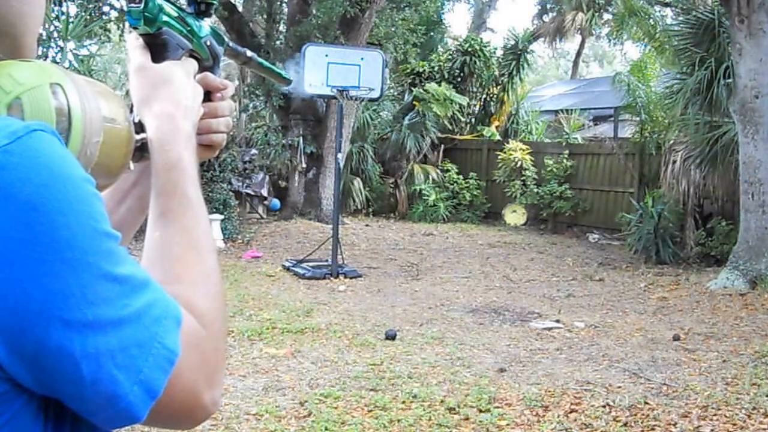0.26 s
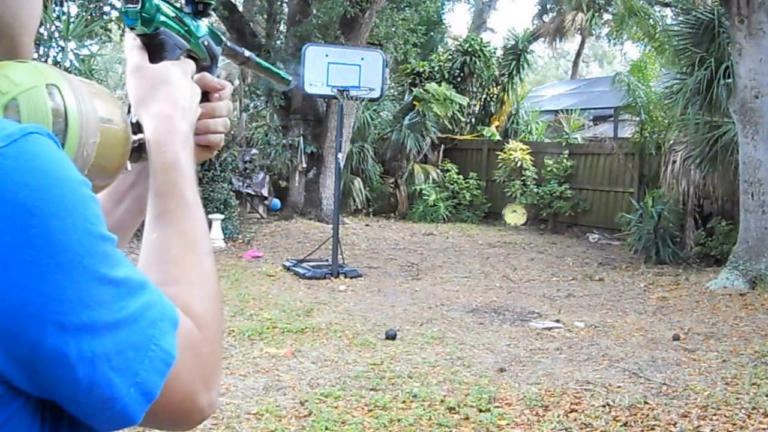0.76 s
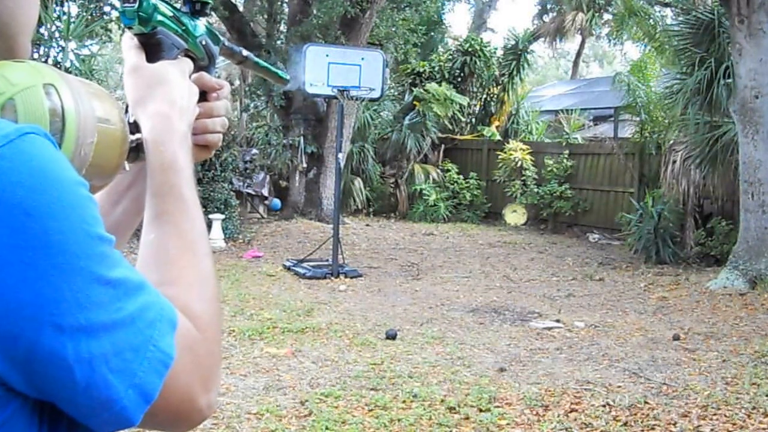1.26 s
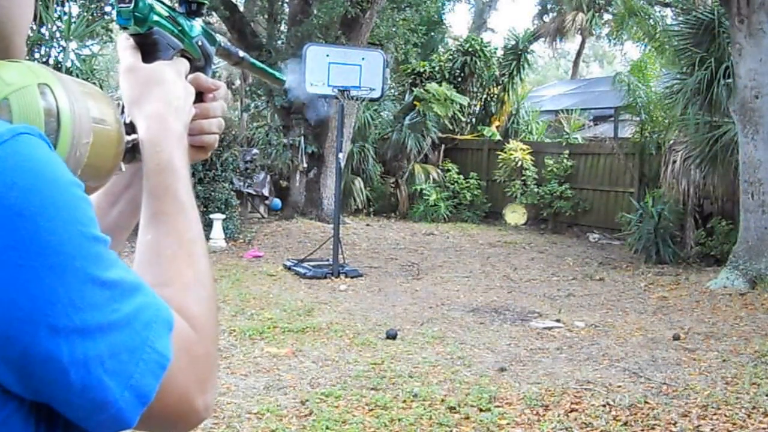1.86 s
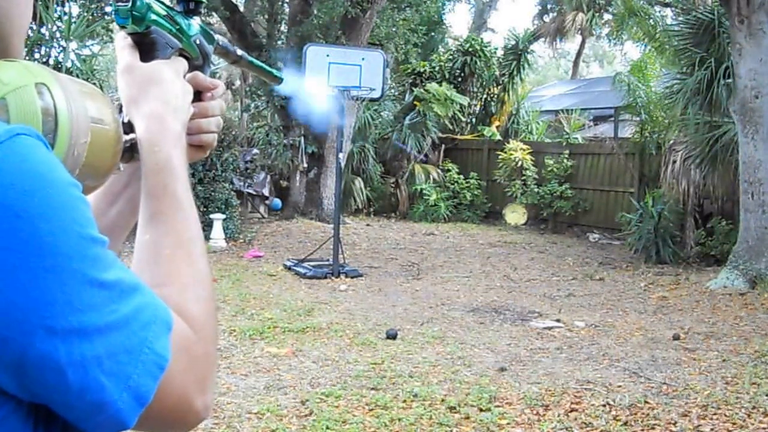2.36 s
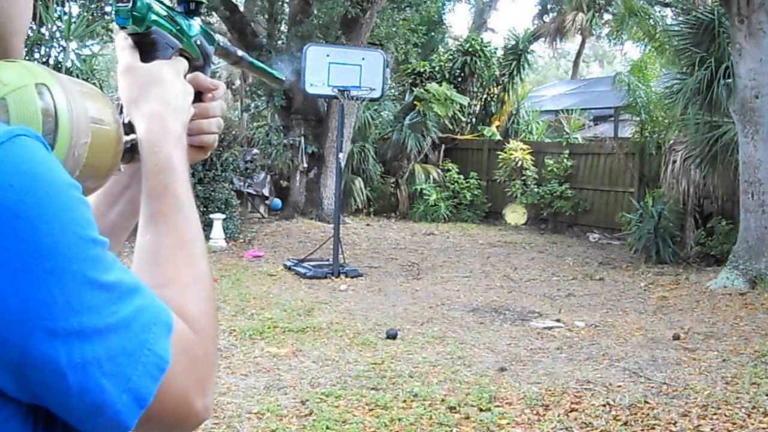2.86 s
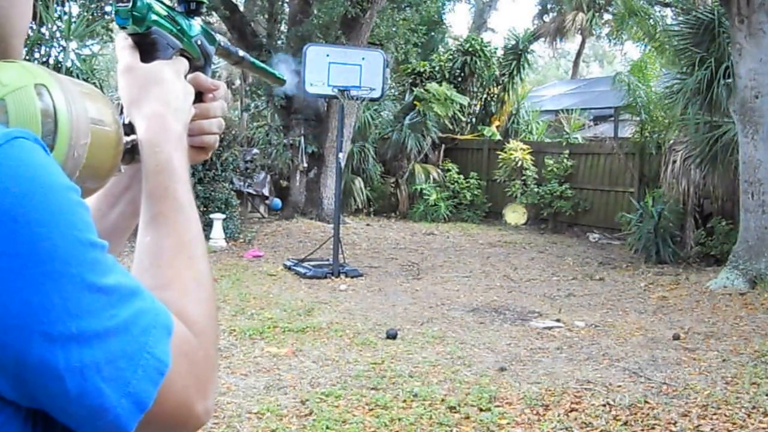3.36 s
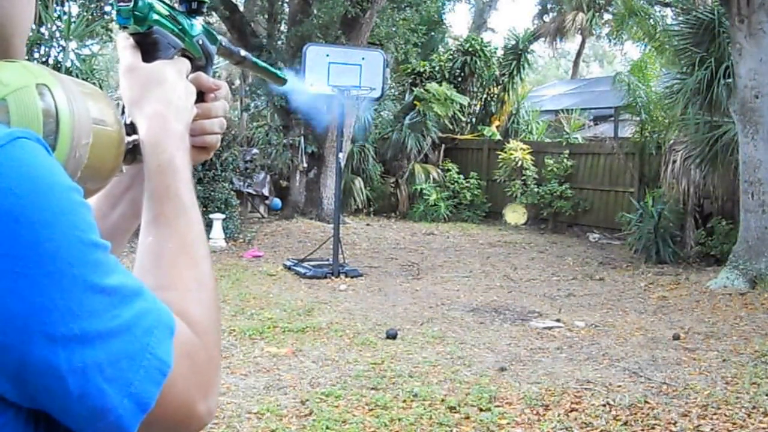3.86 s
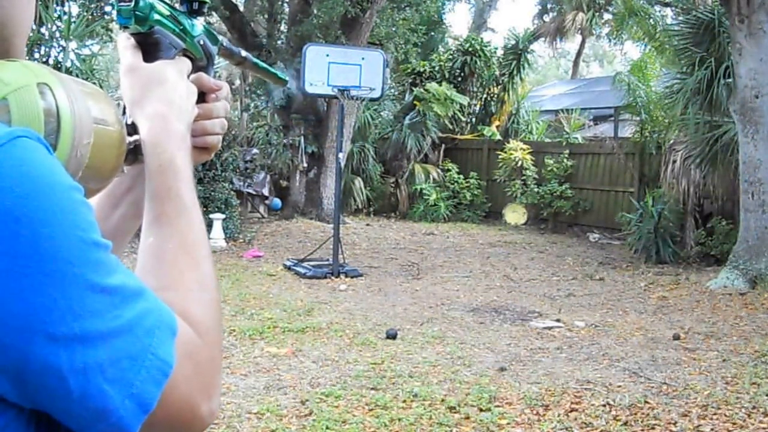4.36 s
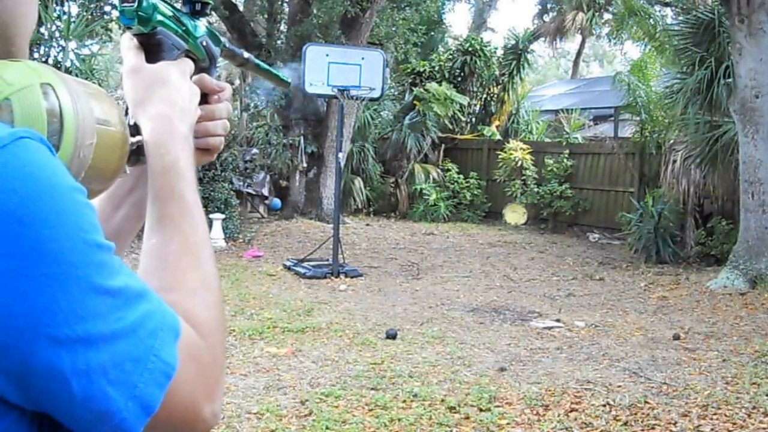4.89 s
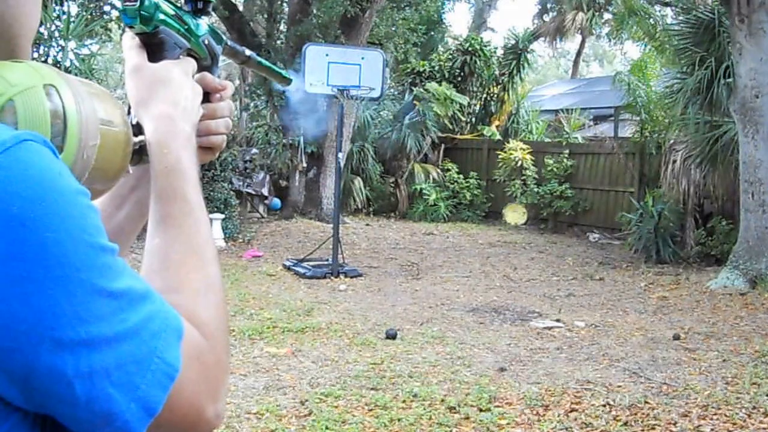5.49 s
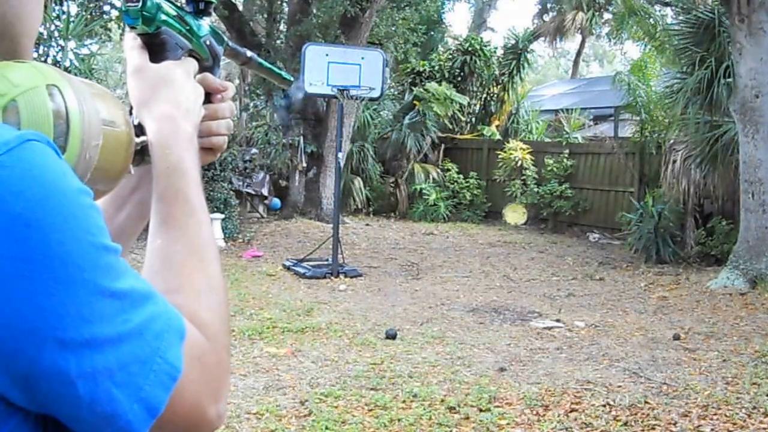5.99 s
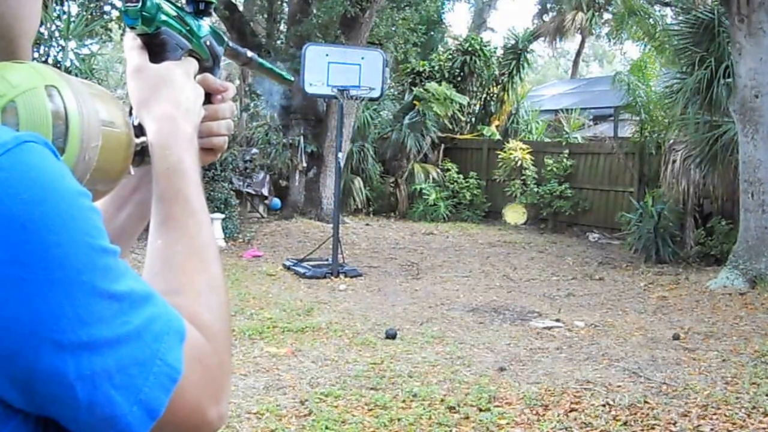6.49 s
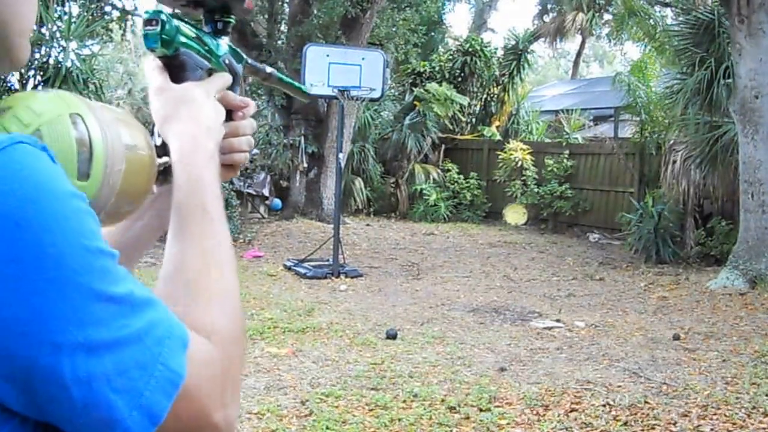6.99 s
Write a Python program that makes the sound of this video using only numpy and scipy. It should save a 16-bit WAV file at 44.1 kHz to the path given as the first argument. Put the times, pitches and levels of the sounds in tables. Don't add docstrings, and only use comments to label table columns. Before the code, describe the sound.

Close, sharp paintball marker pops fired singly, then in quick pairs and triplets, with cracks on a ringing far target and backyard echoes.

```python
import sys
import numpy as np
from scipy import signal
from scipy.io import wavfile
from scipy.ndimage import uniform_filter1d

SR = 44100
rng = np.random.default_rng(int(sys.argv[2]) if len(sys.argv) > 2 else 0)


def attenuation_scalar(level_db):
    decades = np.asarray(level_db, float) / 20
    return 10 ** decades


def output_pcm(signal):
    pcm = np.clip(np.atleast_2d(signal).T, -1, 1) * 32767
    wavfile.write(sys.argv[1], SR, np.round(pcm).astype(np.int16))


N = 319380


def evened(x):
    return x / np.sqrt(np.mean(x ** 2) + 1e-20)


def read(points, hz):
    f, value = np.transpose(points)
    return np.interp(np.log(hz + 1), np.log(f + 1), value)


def add(mix, s, sound):
    part = mix[round(s * SR):][:len(sound)]
    part += sound[:len(part)]


def bandpass(lo_hz, hi_hz, x):
    return signal.sosfilt(signal.butter(2, [lo_hz, hi_hz], "bandpass", fs=SR, output="sos"), x)


def swept_sine(hz):
    return np.sin(2 * np.pi * np.cumsum(hz) / SR)


def ring(modes, detune):
    t = np.arange(round(SR * max(m[2] for m in modes))) / SR
    total = 0
    for hz, db, t60 in modes:
        pitch = hz * (1 + detune * rng.standard_normal())
        total = total + attenuation_scalar(db - 60 * t / t60) * np.sin(2 * np.pi * pitch * t)
    return total


def burst(lo_hz, hi_hz, rise, t60):
    t = np.arange(2000) / SR
    noise = evened(bandpass(lo_hz, min(hi_hz, SR / 2.1), rng.standard_normal(len(t))))
    return .5 * noise * (1 - np.exp(-t / rise)) * attenuation_scalar(-60 * t / t60)


def spike(width, overshoot):
    u = np.arange(60) / SR / width - 4
    return u * np.exp(.5 - u ** 2 / 2) * np.where(u > 0, overshoot, 1)


def patchy_noise(frames, bins, smooth_time, smooth_hz):
    a, b, patches = rng.standard_normal((frames, bins, 3)).T
    patches = uniform_filter1d(patches, size=smooth_time, axis=0)
    patches = evened(uniform_filter1d(patches, size=smooth_hz, axis=1))
    return a + 1j * b, patches


def scatter(colour, decay, lumpy_db, onset):
    hz, t = np.fft.rfftfreq(256, 1 / SR), np.arange(480) * 64 / SR
    noise, lumps = patchy_noise(480, 129, 24, 3)
    start = read(colour, hz)[:, None]
    fall = 60 * t / read(decay, hz)[:, None]
    z = noise * attenuation_scalar(start - fall + lumpy_db * lumps)
    tail = signal.istft(z / np.linalg.norm(attenuation_scalar(start)) * 8, nperseg=256, noverlap=192)[1]
    return tail * (1 - np.exp(-np.arange(len(tail)) / SR / onset))


def after_shots(shape):
    out, curve = np.zeros(N), shape(np.arange(2 * SR) / SR)
    for shot in SHOTS:
        add(out, shot[0], curve)
    return out


# f/Hz, level per Hz/dB
YARD_COLOUR = [(8.8, -40), (15, 8.5), (65, -8), (126, 2), (176, -21), (245, -6.5), (298, -10), (451, -12.5),
               (533, -8), (595, -12.5), (1120, -11.5), (1570, -18.5), (3910, -19), (9470, -27.5),
               (11200, -29.5), (14500, -68.5), (22000, -120)]


def yard():
    hz = np.fft.rfftfreq(1024, 1 / SR)
    noise, patches = patchy_noise(N // 256 + 5, 513, 12, 10)
    z = noise * attenuation_scalar(read(YARD_COLOUR, hz)[:, None] + 1.6 * patches)
    return attenuation_scalar(-57) * evened(signal.istft(z, nperseg=1024, noverlap=768)[1][:N])


# t/s, f/Hz, level/dB
ENGINE = [
    (0.399, 120.3, -57),
    (1.899, 115.8, -66.5),
    (4.099, 115.8, -65),
    (5.6, 119.8, -63.5),
    (6.2, 136, -50),
    (6.8, 135, -69),
    (7.2, 134.1, -56),
]


def drone():
    t, (s, hz, db) = np.arange(N) / SR, np.transpose(ENGINE)
    pitch, level = (evened(uniform_filter1d(rng.standard_normal(N), size=4000)) for _ in range(2))
    tone = swept_sine(np.interp(t, s, hz) * (1 + .02 * pitch))
    return attenuation_scalar(np.interp(t, s, db) + 2.5 * level) * tone


def wind():
    breeze_db, buffet_db, buffet_s = -65, -46, 0.044
    low = evened(bandpass(14, 95, rng.standard_normal(N)))
    buffet = after_shots(lambda t: np.exp(-t / buffet_s))
    return (attenuation_scalar(breeze_db) + attenuation_scalar(buffet_db) * buffet) * low


# start t/s, end t/s, f/Hz, level/dB
BIRD_CALLS = [
    (1.01, 1.12, 3380, -66),
    (2.53, 2.69, 3680, -62.5),
    (4.83, 5.02, 3800, -52.5),
    (7.17, 7.24, 3950, -67),
]


def bird():
    out = np.zeros(N)
    for s, end, hz, db in BIRD_CALLS:
        t = np.arange(0, end - s, 1 / SR)
        wobble = evened(uniform_filter1d(rng.standard_normal(9000), size=200))[:len(t)]
        step_down = .022 * np.tanh((t / t[-1] - .42) / .06)
        call = swept_sine(hz * (1 - step_down + .013 * wobble))
        trill = 1 + 0.45 * np.sin(2 * np.pi * 45 * t)
        add(out, s, attenuation_scalar(db) * trill * call * signal.windows.tukey(len(t), .5))
    return out


def leak():
    centre_hz, half_width_hz, level_db, t60 = 9500, 300, -48, .5
    fade = after_shots(lambda t: np.minimum(t / 0.011, 1) * attenuation_scalar(level_db - 60 * t / t60))
    return fade * evened(bandpass(centre_hz - half_width_hz, centre_hz + half_width_hz, rng.standard_normal(N)))


# f/Hz, level per Hz/dB
SHOT_ECHO_COLOUR = [(35, -47.5), (60, -13), (118, -4), (204, -6), (385, 3), (469, -2.5), (535, -4),
                    (759, -0.5), (1340, -5), (1670, -11), (4980, -10), (9590, -15), (11200, -31),
                    (14500, -75), (22000, -120)]
# f/Hz, t60/s
SHOT_ECHO_DECAY = [(100, 0.2), (400, 0.59), (1200, 0.51), (3000, 0.78), (6000, 0.61), (10000, 0.54)]
# f/Hz, level/dB
HOUSE_COLOUR = [(150, -17), (400, -1.5), (700, -2.5), (1250, -3.5), (1550, -9), (1900, -25.5), (4000, -59)]
# delay t/s, lowest f/Hz, highest f/Hz, level/dB
FENCE_SLAPS = [
    (.063, 1500, 6000, -30),
    (.095, 600, 1700, -33),
    (.178, 600, 1700, -36),
]


def shot_echoes():
    far = np.zeros(N)
    for s, *_ in SHOTS:
        add(far, s + .004, attenuation_scalar(-48) * scatter(SHOT_ECHO_COLOUR, SHOT_ECHO_DECAY, 1.0, 0.00092))
        houses = scatter(HOUSE_COLOUR, [(100, 0.72), (4000, 0.6)], 3.6, 0.049)
        t = np.arange(len(houses)) / SR
        add(far, s + .02, attenuation_scalar(-55.0) * houses * np.exp(-(t / 0.32) ** 6))
        for late, lo_hz, hi_hz, slap_db in FENCE_SLAPS:
            add(far, s + late - .003, attenuation_scalar(slap_db) * burst(lo_hz, hi_hz, 0.0026, 0.037))
    return far


# t/s, level/dB, f/Hz
GEAR_KNOCKS = [
    (3.311, -49.5, 770),
    (4.834, -27.5, 530),
    (4.884, -32, 530),
    (5.511, -39, 644),
    (5.583, -40, 653),
    (5.607, -36, 570),
]
# t/s, level/dB, f/Hz
LIGHT_TICKS = [
    (0.7911, -30, 4570),
    (2.355, -23, 3390),
    (2.372, -20, 3870),
    (2.4984, -42, 3560),
    (6.7514, -24, 4890),
]


def debris():
    out = np.zeros(N)
    for s, db, hz in GEAR_KNOCKS:
        add(out, s, attenuation_scalar(db - 7.5) * ring([(hz, 0, .05)], 0.0092))
        add(out, s, attenuation_scalar(db - 2.5) * burst(420, 1220, 0.0022, 0.066))
    for s, db, hz in LIGHT_TICKS:
        add(out, s, attenuation_scalar(db + 6) * burst(hz * .7, hz * 1.4, .0004, .012))
    return out


def shell_crack(hz):
    crack = burst(2200, 10000, .0002, .009)
    add(crack, .0001, .45 * spike(.00004, 0.93))
    add(crack, 0, -.6 * ring([(hz, 0, .008)], 0.015))
    return crack / abs(crack).max()


# f/Hz, level/dB, t60/s
TARGET_NOTES = [(1244.3, -0.5, 0.5), (1160, 6, .03), (392.5, -4.5, 0.087)]
# f/Hz, level/dB, t60/s
TWIN_NOTE = [(1266, -2.5, 0.285)]


def target_ring():
    damped_share, damp_s = .42, .043
    metal = ring(TARGET_NOTES, .001)
    add(metal, 0, -ring(TWIN_NOTE, .002))
    t = np.arange(len(metal)) / SR
    return metal * (damped_share + (1 - damped_share) * np.exp(-(t / damp_s) ** 4))


# t/s, crack peak level/dB, crack f/Hz, ring level/dB, splash level/dB
BALL_STRIKES = [(0.7006, -9.5, 4530, -42, -36), (1.5143, -9, 6550, -42.5, -36.5),
                (2.2812, 4.5, 2885, -42, -29), (2.974, -7, 4480, -58, -35),
                (3.0931, -13, 2700, -52.5, -37.5), (3.8257, -16, 4390, -63, -43.5),
                (3.9266, -9.5, 5770, -51.5, -39), (4.5519, -10, 5520, -54.5, -37.5),
                (4.6423, -13.5, 5680, -43.5, -38.5), (5.324, -14, 3080, -45.5, -42),
                (5.3996, -10, 4930, -43.5, -39.5), (6.0737, -6.5, 5300, -43, -33.5),
                (6.1617, -2, 4030, -39.5, -28.5), (6.8163, -15.5, 5990, -62, -44.5),
                (6.9033, -11.5, 6770, -46, -38.5), (6.9862, -16, 3140, -46.5, -42)]
# f/Hz, level per Hz/dB
STRIKE_ECHO_COLOUR = [(200, -8.5), (450, -1), (800, -4.5), (1300, 0), (1800, -8.5), (3400, 0), (6000, -1),
                      (8500, -7.5), (10300, -12), (11200, -8)]
# f/Hz, t60/s
STRIKE_ECHO_DECAY = [(300, 0.31), (1500, 0.53), (4000, 0.53), (7000, 0.5), (10000, 0.44)]


def strikes():
    out, t = np.zeros(N), np.arange(2000) / SR
    for s, db, hz, ring_db, splash_db in BALL_STRIKES:
        thud_db = splash_db + 7.5
        add(out, s - .0002, attenuation_scalar(db) * shell_crack(hz))
        add(out, s, attenuation_scalar(thud_db + 5.0) * burst(600, 1230, 0.0003, 0.037))
        add(out, s + .001, attenuation_scalar(ring_db + 9) * target_ring())
        add(out, s, attenuation_scalar(splash_db + 11.5) * burst(2000, 8000, 0.0022, 0.019))
        near_walls = burst(2000, 6500, .004, .3) * np.exp(-(t / .034) ** 6)
        add(out, s, attenuation_scalar(splash_db + 9) * near_walls)
        echoes = scatter(STRIKE_ECHO_COLOUR, STRIKE_ECHO_DECAY, 1.76, 0.0053)
        add(out, s + 0.0021, attenuation_scalar(splash_db - 15.5) * echoes)
    return out


# f/Hz, level/dB, t60/s
STRIKER_NOTES = [(1246, -3.5, 0.0081), (700, -60.5, 0.002), (4770, -16.5, 0.026), (9300, -21, .01)]


def striker(near, s, db):
    hit = s - .01285
    add(near, hit - .0002, -attenuation_scalar(db) * ring(STRIKER_NOTES, 0.12))
    add(near, hit + .0008, attenuation_scalar(db - 3.0) * burst(3500, 7800, 0.0015, 0.016))
    add(near, hit + .001, attenuation_scalar(db / 2 - 20) * burst(300, 2500, .003, .15))
    add(near, hit - .003, attenuation_scalar(db - 27.0) * burst(1000, 5400, .0003, 0.018))


# f/Hz, level/dB, t60/s
POP_NOTES = [(2144, -4.5, 0.015), (2734, -15, 0.029), (1036, -21.5, 0.011), (5064, -9, 0.013),
             (9700, -21.5, 0.0089)]


def muzzle_pop(near, s, db, puff_db):
    add(near, s - .0002, attenuation_scalar(db + 1) * spike(.00006, .4))
    add(near, s, attenuation_scalar(db) * ring(POP_NOTES, 0.026))
    add(near, s, attenuation_scalar(db - 6) * burst(1200, 10000, 0.00017, 0.082))
    add(near, s + .008, attenuation_scalar(db - 29.0) * burst(8800, 10300, 0.0036, 0.17))
    add(near, s + .0016, attenuation_scalar(puff_db + 2) * spike(.00009, .3))


# f/Hz, level/dB
BARREL_NOTES = [(311, -15.5), (385, -23), (455, -21), (538, -25), (630, -29.5), (810, -28), (950, -27),
                (1045, -28), (1140, -28.5)]


def barrel_boom():
    t = np.arange(1800) / SR
    boom = sum(attenuation_scalar(db) * np.sin(2 * np.pi * hz * t) for hz, db in BARREL_NOTES)
    boom *= (1 - 0.46 * np.exp(-t / .002)) * np.exp(-(t / 0.017) ** 2.6)
    thump = swept_sine(105 + 3600 * t) * (1 - np.exp(-t / 0.0024)) * np.exp(-(t / 0.02) ** 2.5)
    return boom + attenuation_scalar(-19.5) * thump


def valve_whistle():
    t = np.arange(1800) / SR
    glide = 6500 * (1 + .025 * rng.standard_normal()) * (1 - .06 * np.exp(-t / .001))
    whistle = swept_sine(glide)
    whistle += .3 * np.sin(2 * np.pi * 9500 * (1 + .03 * rng.standard_normal()) * t)
    whistle += .8 * burst(5000, 10500, .0003, .1)[:len(t)]
    return whistle * np.minimum(t / .0002, 1) * np.exp(-(t / .0024) ** 3)


# muzzle pop t/s, pop level/dB, striker level/dB, second puff level/dB
SHOTS = [(0.4217, -4.5, 8, -20), (1.2285, -4.5, -8, -19), (1.9913, -3.5, -4, -9), (2.6983, -6, -6.5, -7),
         (2.8003, -5.5, -7.5, -4), (3.4574, -6.5, -8.5, -10), (3.5388, -7.5, -7.5, -6),
         (3.62, -5, -9, -6.5), (4.2768, -10, -15, -15), (4.358, -10, -13.5, -23), (5.031, -3.5, 0, -15),
         (5.1113, -7.5, -29, -10), (5.7908, -7, -11, -13), (5.872, -7, -9, -19), (6.5276, -4, -4, -10),
         (6.6084, -5, -7, -9), (6.69, -7, -10.5, -10)]


def marker():
    near, boom = np.zeros(N), barrel_boom()
    for s, db, striker_db, puff_db in SHOTS:
        whistle_db, return_db = -6 + 0.19 * db, -8 + 0.83 * db
        striker(near, s, striker_db)
        muzzle_pop(near, s, db, puff_db)
        add(near, s + .0019, attenuation_scalar(db / 2 + 1.0) * boom)
        add(near, s + .0038, attenuation_scalar(whistle_db - 2) * valve_whistle())
        add(near, s + .0278 - .001, attenuation_scalar(return_db + 7) * burst(2500, 10000, .0006, .009))
    return signal.sosfilt(signal.butter(2, 85, "highpass", fs=SR, output="sos"), near)


# t/s, level/dB
CAMERA_GAIN = [(0, 26), (.41, 25.5), (.42, 0.5), (1.2, 1.5), (1.948, 2.5), (2.27, 11.5), (2.3, 2.5),
               (2.65, 5.5), (3.429, 4.5), (4.25, 1), (4.62, 0.5), (4.75, 17.5), (5.0, 11.5), (5.3, -1.5),
               (5.6, 2.5), (6.0, 1.5), (6.15, 11), (7.25, 1.5)]


def camera_gain():
    sag_db, sag_s = 1.5, 0.35
    sag = sag_db * after_shots(lambda t: t / sag_s * np.exp(1 - t / sag_s))
    return attenuation_scalar(np.interp(np.arange(N) / SR, *np.transpose(CAMERA_GAIN)) - sag)


def scene():
    lifted = camera_gain() * (yard() + leak() + shot_echoes())
    return (lifted + drone() + wind() + bird() + debris() + strikes() + marker())[None]


def roll_off(x):
    return signal.sosfilt(signal.butter(12, 11330, fs=SR, output="sos"), x)


def record(dry):
    edge = signal.firwin(101, 10560, window=("kaiser", 8.0), fs=SR)
    mix = np.clip(signal.oaconvolve(dry, edge[None], "same"), -1, 1)
    return roll_off(mix)


dry = scene()
out = record(dry)
output_pcm(out)
```